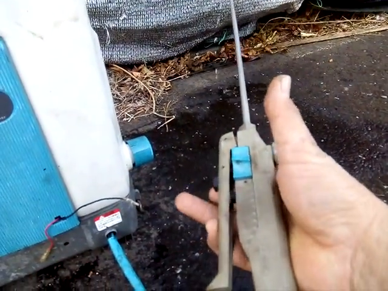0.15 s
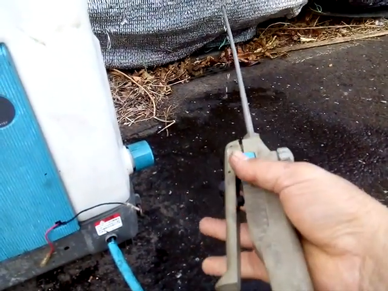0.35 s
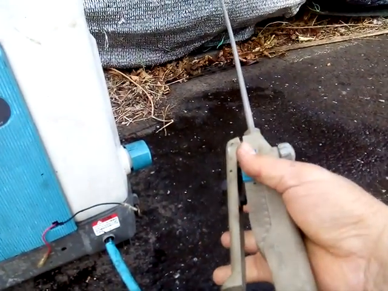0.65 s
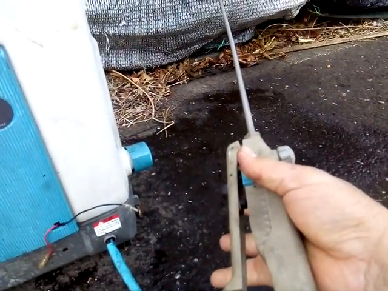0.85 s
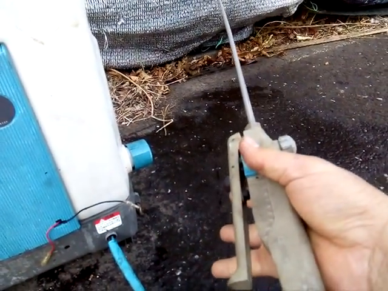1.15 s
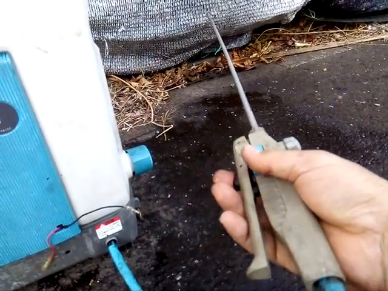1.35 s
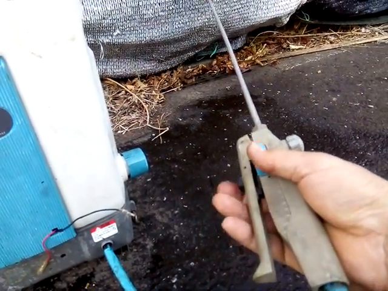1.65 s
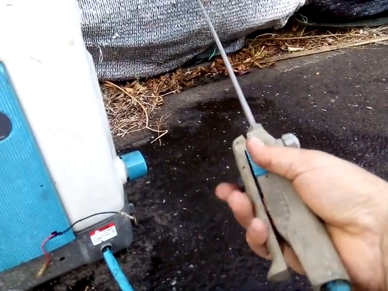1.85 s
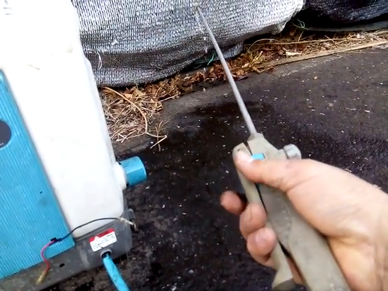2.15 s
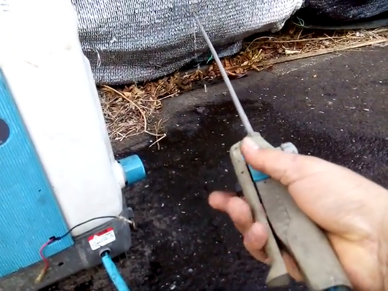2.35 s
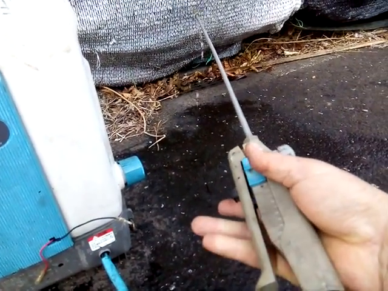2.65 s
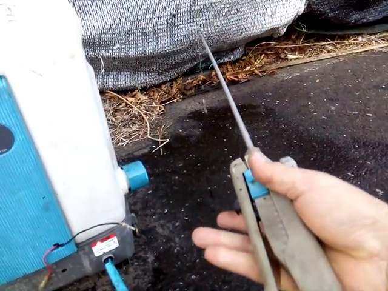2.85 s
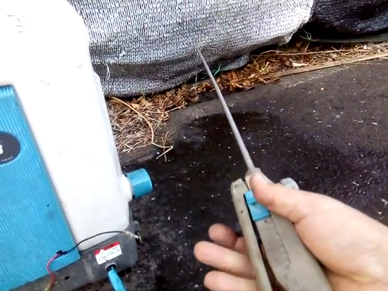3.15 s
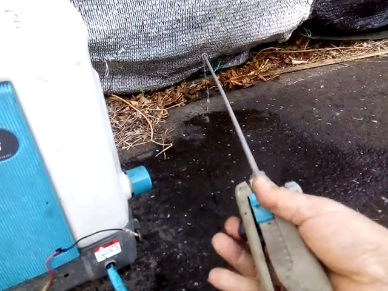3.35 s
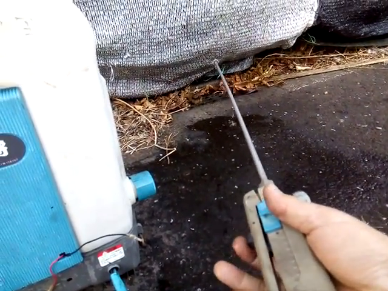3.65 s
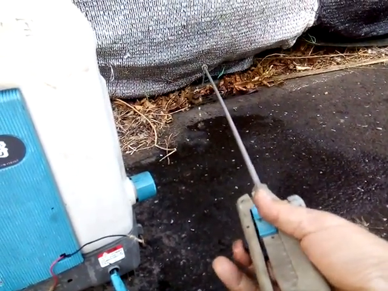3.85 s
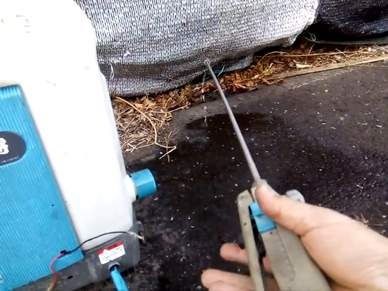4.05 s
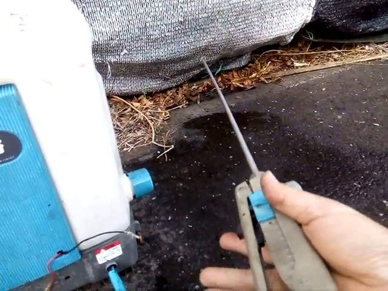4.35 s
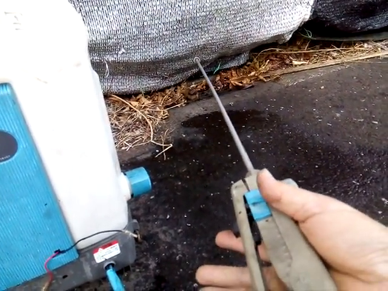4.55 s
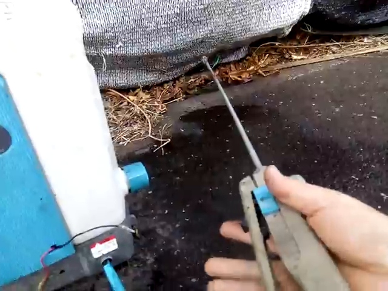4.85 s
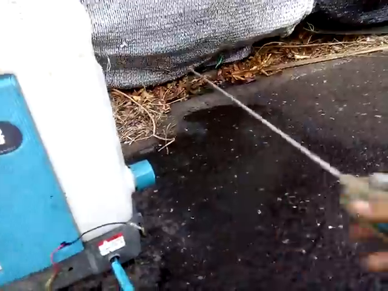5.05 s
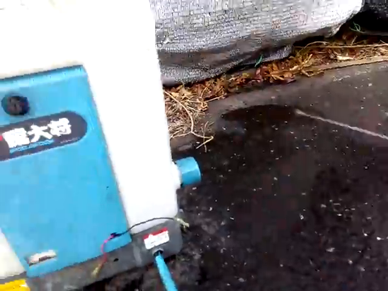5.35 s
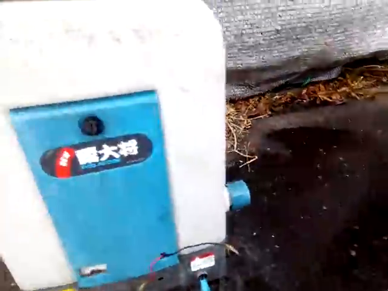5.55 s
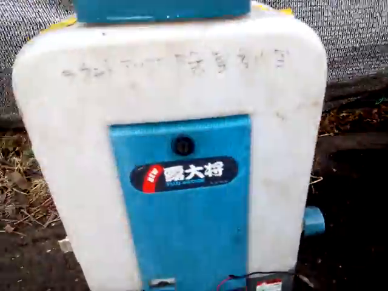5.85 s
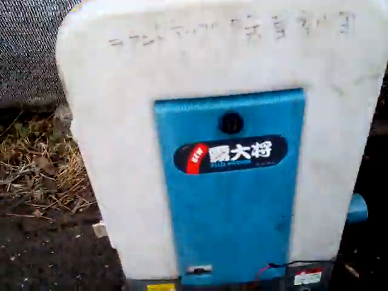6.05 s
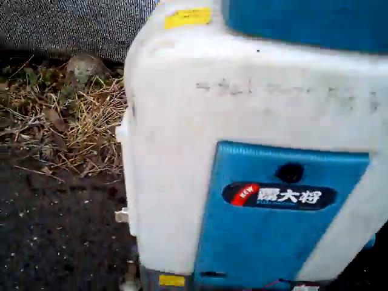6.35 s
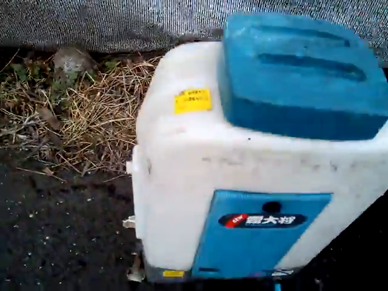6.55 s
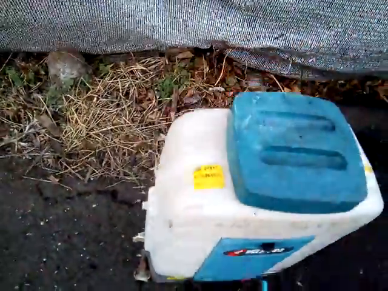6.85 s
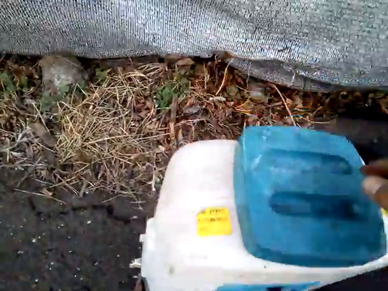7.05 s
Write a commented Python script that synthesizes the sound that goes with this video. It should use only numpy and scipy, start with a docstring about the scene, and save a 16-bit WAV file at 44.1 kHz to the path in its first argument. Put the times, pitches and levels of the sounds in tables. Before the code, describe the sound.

A small electric pump hums and buzzes, stops at a trigger click, runs again, then a loud plastic snap, shut-off, and a clattering lance.

```python
"""A low outdoor rumble and a faint hiss lie under everything in an open yard.
A battery garden sprayer's diaphragm pump hums while water leaves the lance, then coasts to rest: shaft orders,
valve ticks and jet noise follow the shaft. The trigger clicks, through resonances of its plastic, and the pump
runs again; shortly before it stops the trigger lock snaps, a loud bundle of short decaying sines.
Then the lance is laid down with a clatter of struck resonances and a noisy rustle of hose and sleeve."""
import sys
import numpy as np
from scipy import signal
from scipy.fft import rfft, irfft, next_fast_len
from scipy.io import wavfile
from scipy.ndimage import uniform_filter1d, map_coordinates

SR = 44100
rng = np.random.default_rng(int(sys.argv[2]) if len(sys.argv) > 2 else 0)


def wrap_up_sound(samples):
    """Save the sound to the file named by the first command line argument, as 16-bit audio."""
    columns = np.atleast_2d(samples).T
    # keep every value between -1 and 1, then stretch to whole-number steps
    tamed = np.clip(columns, -1, 1)
    steps = np.round(tamed * 32767).astype(np.int16)
    wavfile.write(sys.argv[1], SR, steps)


N = 317520

# shaft speed that counts as 1, in turns a second
REFERENCE_HZ = 38.6
# diaphragm and valve beats within one turn:
# (share of the turn, low thump/dB, bright slap/dB, valve tick/dB, crank knock/dB)
BEATS = [(0, 3.5, -6.5, -2, -0.5), (.155, -3.5, 2.5, -10, -3.5), (.463, -16, -6, -11, 3.5),
         (.563, -6, -5, -9, -3.5), (0.885, -7, -10, -13.5, -10.5)]
# resonances of the pump housing: (f/Hz, width/Hz, level/dB)
HOUSING = [(180, 58, -2), (556.7, 58, 1.5), (782, 56, -7.5), (915.3, 55, -14), (1222, 210, -18.5)]


def amp(db):
    """Decibels to gain."""
    return 10 ** (np.asarray(db) / 20)


def unit(x):
    """Scaled to rms 1."""
    return x / np.sqrt(np.mean(x ** 2) + 1e-20)


def along(points, hz):
    """Value at hz on a curve of (f/Hz, value) points, read on a log axis."""
    f, v = np.transpose(points)
    return np.interp(np.log(hz + 1), np.log(f + 1), v)


def curves(rows):
    """One value per sample for each column after the time."""
    s, *cols = np.transpose(rows)
    return [np.interp(np.arange(N) / SR, s, c) for c in cols]


def wobble(rate):
    """A smooth random curve, rate knots a second."""
    knots = rng.standard_normal(int(N * rate / SR) + 4)
    return map_coordinates(knots, [np.arange(N) * rate / SR])


def pan(db):
    """Left and right gains for a level difference."""
    return amp(np.array([[.5], [-.5]]) * db)


def filtered(x, response):
    """x shaped by a complex response of frequency."""
    n = x.shape[-1]
    m = 2 * next_fast_len((n + min(n, SR // 4)) // 2, real=True)  # room for the ringing
    return irfft(rfft(x, m) * response(np.fft.rfftfreq(m, 1 / SR)), m)[..., :n]


def causal(gain):
    """Minimum-phase response with these gains: it rings only after it is struck."""
    cepstrum = irfft(np.log(np.maximum(gain, 1e-6)))
    half = len(cepstrum) // 2
    folded = np.r_[cepstrum[0], 2 * cepstrum[1:half], cepstrum[half], np.zeros(half - 1)]
    return np.exp(rfft(folded))


def resonances(modes, hz):
    """Response of a body with (f/Hz, width/Hz, level/dB) modes of alternating sign."""
    return sum((-1) ** k * amp(db) * 1j * hz * width / (centre * centre - hz * hz + 1j * hz * width)
               for k, (centre, width, db) in enumerate(modes))


def rush(spectrum):
    """Stereo noise of rms 1, alike in the bass and nearly unrelated in the treble."""
    # left-right likeness of the noise: (f/Hz, correlation)
    likeness = [(130, .94), (290, 0.58), (640, 0.28), (1400, 0.034)]
    turn = lambda hz: np.arccos(np.clip(along(likeness, hz), -1, 1)) / 2
    colour = lambda hz: amp(along(spectrum, hz)) * [np.cos(turn(hz)), np.sin(turn(hz))]
    mid, side = filtered(rng.standard_normal((2, N)), colour)
    return unit(np.array([mid + side, mid - side]))


def add(track, s, sound):
    """Mix a short sound into the track at time s."""
    start = max(round(s * SR), 0)
    part = track[..., start:start + sound.shape[-1]]
    part += sound[..., :part.shape[-1]]


def outdoors(swell_db, swells_per_s, wander_db):
    """A distant rumble that swells and sinks, its upper part on its own, and a faint even hiss."""
    # rumble before its random swell: (t/s, level/dB)
    rumble_levels = [(0, -53.5), (2, -56), (3.4, -53), (3.85, -44.5), (4.5, -56), (5.3, -52), (6.1, -58),
                     (7.2, -55.5)]
    # upper rumble before its random wander: (t/s, level/dB)
    upper_levels = [(.55, -64), (.85, -55.5), (1.15, -61), (1.45, -53.5), (1.75, -65), (2, -57),
                    (4.4, -60.5), (5.55, -55), (6, -59.5), (6.55, -65), (6.78, -50.5), (6.92, -67)]
    # noise colour of rumble, upper rumble and hiss: (f/Hz, density/dB per Hz)
    rumble_colour = [(12, -58), (20, -23.5), (32, -15), (80, -2), (115, -3), (166, -7), (205, -11),
                     (281, -18), (325, -16), (532, -33), (900, -43.5), (1170, -78.5), (1980, -120)]
    upper_colour = [(90, -31), (125, -8), (146, 3), (172, -8), (205, -3.5), (260, -13.5), (420, -35),
                    (900, -69.5)]
    hiss_colour = [(290, -25.5), (500, -5), (748, -10.5), (927, -10.5), (1060, -13), (1150, -13),
                   (1580, -16), (3740, -18.5), (4500, -14.5), (5350, -19.5), (15500, -40.5)]
    level, = curves(rumble_levels)
    upper_level, = curves(upper_levels)
    rumble = amp(level + swell_db * wobble(swells_per_s)) * rush(rumble_colour)
    upper = amp(upper_level + wander_db * wobble(9)) * rush(upper_colour)
    hiss = amp(-72) * rush(hiss_colour)
    return pan(0.84) * (rumble + upper + hiss)


def yard(x):
    """Ground and fence give a weak answer; each frequency dies at its own speed."""
    # decay of the answer: (f/Hz, t60/s)
    decay = [(200, 1), (2000, 0.067), (5000, 0.17), (12000, 0.17)]
    hz, t, z = signal.stft(rng.standard_normal((2, SR // 2)), SR, nperseg=256)
    tail = signal.istft(z * amp(-60 * t / along(decay, hz)[:, None]), SR, nperseg=256)[1]
    return signal.fftconvolve(x, tail / np.linalg.norm(tail[0]), axes=1)[:, :N]


def strokes():
    """Strength of the hose's drag and the sleeve's rustle: each arm movement swells and dies away."""
    # arm movements: (t/s of the fastest moment, flank length/s, hose drag/dB, sleeve rustle/dB)
    moves = [(1.125, 0.28, -75.5, -76.5), (5.223, 0.18, -68, -62), (5.852, 0.22, -50, -52.5),
             (6.21, 0.069, -59.5, -54.5), (6.362, 0.14, -55.5, -52.5), (6.733, 0.2, -66, -61),
             (7.104, 0.16, -78, -63.5)]
    # exponent of the bell's flanks, and its dying away over its swelling
    shape, release = 1.42, 1.01
    t, power = np.arange(N) / SR, np.zeros((2, N))
    for s, length, drag_db, rustle_db in moves:
        away = np.maximum((s - t) / length, (t - s) / (length * release))
        power += (amp([[drag_db], [rustle_db]]) * np.exp(-away ** shape)) ** 2
    return np.sqrt(power)


def patchy(x, depth_db):
    """Sliding contact keeps shifting: the colour changes in random patches."""
    z = signal.stft(x, nperseg=512)[2]
    field = uniform_filter1d(rng.standard_normal(z.shape[1:]), size=3, axis=0)
    field = uniform_filter1d(field, size=7, axis=1)
    return signal.istft(z * amp(depth_db * unit(field)), nperseg=512)[1][:, :N]


def scrapes(width_hz):
    """The hose scrapes along the tank: narrow rasps that swell, glide in pitch and fade."""
    # scrapes: (start t/s, length/s, first f/Hz, last f/Hz, level/dB)
    rasps = [(5.735, 0.06, 2800, 2950, -52), (5.87, 0.077, 2700, 2700, -53.5),
             (5.78, 0.45, 1450, 1100, -62), (6.0, 0.6, 1330, 1450, -66)]
    out = np.zeros((2, N))
    for s, length, first_hz, last_hz, db in rasps:
        u = np.linspace(0, 1, round(length * SR))
        noise = rng.standard_normal((2, len(u)))
        rasp = unit(filtered(noise, lambda hz: 1 / (1 + (hz / width_hz) ** 2)))
        pitch_hz = first_hz + (last_hz - first_hz) * u
        glide = np.sqrt(2) * np.sin(2 * np.pi * np.cumsum(pitch_hz) / SR)
        add(out, s, amp(db) * np.sqrt(abs(np.sin(np.pi * u))) * rasp * glide)
    return out


def handling(grain_db, patchy_db):
    """Hose and sleeve slide in uneven grains as the arm moves."""
    # noise colour of hose drag and sleeve rustle: (f/Hz, density/dB per Hz)
    drag_colour = [(200, -4), (350, -4.5), (700, -7.5), (1000, -7), (1400, -2), (1900, -5.5), (2600, -5),
                   (3500, -4.5), (6000, -42.5)]
    rustle_colour = [(1500, -12.5), (2800, -13.5), (3800, -0.5), (4600, 5), (5400, 0), (6300, 0),
                     (7200, -18.5), (8300, -50), (14000, -41.5)]
    drag, rustle = strokes()
    grains = lambda: unit(amp(grain_db * (wobble(180) + 0.79 * wobble(35))))
    hose = grains() * (drag * unit(patchy(rush(drag_colour), patchy_db)) + scrapes(width_hz=100))
    sleeve = rustle * grains() * rush(rustle_colour)
    return pan(1.7) * (hose + sleeve)


def clatter(side_spread_db, dulling_db, count):
    """Rows for clicks(): each blow of the lance, its weaker, duller rebound, and rattling fittings."""
    # lance meets tank and ground:
    # (t/s, peak/dB, left-right/dB, tilt/dB per octave, favoured f/Hz, its lift/dB)
    blows = [(5.381, -34.5, -1, 2, 3320, 5), (5.538, -34.5, 5, 1, 2090, 12),
             (5.5485, -11, -3.5, 1.5, 3240, 10), (5.575, -36, 4, -3, 2600, 4.5),
             (5.6082, -21.5, -5, 8, 5840, 7.5), (5.622, -42.5, -6, 4, 5600, 6),
             (5.6495, -24, -1.5, 0.5, 845, 5.5), (5.662, -32.5, 5, -1, 2550, 1),
             (5.692, -27.5, -1, 2.5, 3300, 11), (5.700, -30.5, -9, 2, 5550, 10),
             (5.712, -34.5, -5, 1, 3200, 8), (5.802, -41, -8, 5.5, 5500, 0),
             (5.8398, -6.5, -2, 8, 2477, 19), (5.8472, -3.5, 4.5, 1, 4580, 7.5),
             (5.865, -38, -3.5, -1, 4170, 16), (5.886, -29.5, -8.5, 2, 2600, 8), (5.9, -31, 6, 1, 5800, 5),
             (5.929, -30.5, 0, 0.5, 2450, 13), (5.945, -34.5, 4, -2, 2550, 16),
             (6.6818, -22.5, 5, -1.5, 3780, 15.5)]
    # loose fittings rattle while the lance settles: (from t/s, to t/s, middle peak/dB)
    start, end, db_loose = (5.56, 5.96, -40)
    t60, flight_s, rebound_loss_db = 0.03, 0.011, 20.5
    rows = []
    for (s, db, side_db, tilt_db, *spot), flight in zip(blows, rng.standard_normal(len(blows))):
        rows.append((s, db, side_db, tilt_db, t60, *spot))
        landing = s + flight_s * np.exp(0.16 * flight)
        rows.append((landing, db - rebound_loss_db, side_db, tilt_db - dulling_db, t60, *spot))
    for k, (when, size, side, tilt, spot) in enumerate(rng.uniform(-0.63, 1, (count, 5))):
        s = start + (end - start) * (k + .5 + .5 * when) / count
        rows.append((s, db_loose + 3 * size, side_spread_db * side, 4 * tilt - dulling_db, .02,
                     1300 * 2 ** spot, 9))
    return rows


def clicks(rows, modes, crack_db, crack_t60, soft_hz, low_hz, favoured_width_hz):
    """A sharp crack and a short chatter ring the resonances; the spot struck favours one region."""
    out, t = np.zeros((2, N)), np.arange(SR // 12) / SR
    for s, db, side_db, tilt_db, t60, ring_hz, lift_db in rows:
        envelope = amp(-60 * t / t60) + amp(crack_db - 60 * t / crack_t60)
        force = rng.standard_normal((2, len(t))) * envelope
        edge_hz = soft_hz * 2 ** (tilt_db / 16)  # a bright contact also reaches higher
        tilted = lambda hz: amp(tilt_db * np.log2(np.clip(hz, 1000, 8000) / 4000))
        colour = lambda hz: tilted(hz) * (0.21 + 1 / np.sqrt(1 + (hz / edge_hz) ** 12))
        small = lambda hz: .06 + hz ** 6 / (hz ** 6 + low_hz ** 6)  # a small part radiates little bass
        spot = lambda hz: amp(lift_db / (1 + ((hz - ring_hz) / favoured_width_hz) ** 2))
        ring = filtered(force, lambda hz: resonances(modes, hz) * causal(colour(hz) * small(hz) * spot(hz)))
        add(out, s, amp(db) * pan(side_db) * ring / abs(ring).max(axis=1, keepdims=True))
    return out


def lock(crack_db, rise_s, far_hold):
    """The trigger lock springs over: one very loud, short ring, which dies sooner on the right."""
    # the snap: (t/s, gain/dB, left-right/dB)
    s, db, side_db = (3.9759, 3.14, 2.2)
    # partials of the ring: (f/Hz, level/dB, hold/s, t60/s)
    partials = [(2497, -25.5, .001, 0.0053), (3450, -26.5, .001, 0.021), (4478, -0.5, 0.0029, 0.0095),
                (4400, -21.5, .001, .04), (5350, -4, .001, 0.0058), (6600, -3.5, 0.0013, 0.0068)]
    out, t = np.zeros((2, N)), np.arange(SR // 10) / SR
    holding = np.array([[1], [far_hold]])
    ring = sum(amp(level - 60 * np.maximum(t - hold * holding, 0) / t60) * np.sin(2 * np.pi * hz * t)
               for hz, level, hold, t60 in partials)
    crack = amp(crack_db - 60 * t / .008) * rng.standard_normal((2, len(t)))
    onset = 1 - np.exp(-(t / rise_s) ** 2)
    add(out, s, amp(db) * pan(side_db) * onset * (ring + crack))
    return out


def shaft():
    """Shaft speed, turns and age of the run: it spins up, sags as pressure builds, coasts to rest."""
    # pump runs: (on t/s, off t/s, free speed/turns per s, crank angle when first heard/turns)
    runs = [(-1, .3344, 37.894, .312), (2.0051, 4.0957, 39.431, .274)]
    spin_up_s, sag_hz_per_s, coast_s = .0477, .742, .1836
    t = np.arange(N) / SR
    speed, turns, age = np.zeros((3, N))
    for on, off, free_hz, angle in runs:
        live = (t >= on) & (t < off + coast_s)
        age[live] = t[live] - on
        coasting = np.clip(1 - (t[live] - off) / coast_s, 0, 1)
        spin_up = 1 - np.exp(-age[live] / spin_up_s)
        rate = (free_hz - sag_hz_per_s * age[live]) * spin_up * coasting
        speed[live], turns[live] = rate / REFERENCE_HZ, angle + np.cumsum(rate) / SR
    return speed, turns, age


def hum(speed, turns, waver_db):
    """Shaft orders, phased into each turn's beats, swell as they slide into housing resonances."""
    # orders of the motor's hum: (multiple of the shaft speed, relative level/dB)
    orders = [(2, -8), (3, -6), (4, -8), (5, -1), (6, -12), (7, -13), (8, -15), (9, -13), (10, -22),
              (11, -23.5), (12, -13), (13, -11), (14, -9), (15, 0), (16, -3.5), (17, -15), (18, -10.5),
              (19, -2.5), (20, -2.5), (21, -6), (22, -13), (23, -7), (24, -6), (25, -20.5), (26, -6),
              (27, -25), (28, -15.5), (29, -17), (30, -26), (31, -11), (32, -19), (33, -12.5), (34, -18),
              (35, -15), (39, -18.5), (40, -20), (41, -22), (44, -21.5), (113, -25.5), (120, -26),
              (132, -30.5), (162, -33.5)]
    # left-right likeness of the hum: (f/Hz, correlation)
    likeness = [(130, 0.99), (290, 1), (640, 0.31), (1400, 0.15)]
    thump_hz, slap_hz = 500, 1500  # between these the beats' phasing goes from thump to slap
    out, running = np.zeros((2, N)), np.flatnonzero(speed > .5)
    grid = np.linspace(.5, 1.1, 100)
    for k, db in orders:
        hz = k * REFERENCE_HZ
        throb = sum(amp(along([(thump_hz, thump_db), (slap_hz, slap_db)], hz)) * np.exp(-2j * np.pi * k * share)
                    for share, thump_db, slap_db, *_ in BEATS)
        gain = abs(resonances(HOUSING, hz * grid) / resonances(HOUSING, hz))
        swell = np.interp(speed[running], grid, gain)
        lead = np.arccos(np.clip(along(likeness, hz), -1, 1)) * np.array([[.5], [-.5]])
        waver = np.interp(running, np.linspace(0, N, num=50), rng.standard_normal(50))
        # the lowest orders are spread over the turn, so the bass hums evenly instead of pulsing
        spread = .2 * max(12 - k, 0) ** 2
        size = amp(db + waver_db * waver) * swell / np.cos(lead[0] / 2) ** 2  # wide orders get a lift
        out[:, running] -= size * np.sin(2 * np.pi * k * turns[running] + np.angle(throb) + spread + lead)
    return out / np.linalg.norm(amp(np.array(orders)[:, 1])) * np.sqrt(2)


def beats(speed, turns, driven_softening, coasting_softening, uneven_db):
    """Pulses of diaphragm thumps, valve ticks and crank knocks: softer when slow, less so when driven."""
    thumps, ticks, knocks = trains = np.zeros((3, N))
    for share, thump_db, _, tick_db, knock_db in BEATS:
        at = np.flatnonzero((np.diff(np.floor(turns - share)) == 1) & (speed[:-1] > 0))
        force = speed[at] ** np.where(speed[at + 1] > speed[at], driven_softening, coasting_softening)
        sizes = amp([[thump_db], [tick_db], [knock_db]]) * force
        sizes[0] *= speed[at] if share else 1  # the after-thumps need speed
        sizes[1:] *= amp(uneven_db * wobble(40)[at])
        # a beat falls between two samples
        early = np.clip((turns[at + 1] - share) % 1 / (turns[at + 1] - turns[at]), 0, 1)
        trains[:, at] += sizes * early
        trains[:, at + 1] += sizes * (1 - early)
    return thumps, ticks, knocks


def gushes(speed, turns, driven_softening, coasting_softening):
    """Water squeezes through the valves for a fixed part of each turn: groans at start, fading gurgles."""
    # gushes within one turn: (share of the turn, half-width/turns, level/dB)
    openings = [(.16, 0.092, -0.5), (.63, 0.127, -1)]
    # noise colour of the water: (f/Hz, density/dB per Hz)
    water_colour = [(120, -30), (280, -9.5), (520, 8), (680, 2), (900, -3), (1250, -5), (1550, -14),
                    (1800, -21), (2400, -17.5), (3500, -46.5)]
    opening = sum(amp(db) * np.exp(-(((turns - share + .5) % 1 - .5) / width) ** 2)
                  for share, width, db in openings)
    force = speed ** np.where(np.gradient(speed) > 0, driven_softening, coasting_softening)
    return force * (opening + 0.19) * rush(water_colour)  # 0.19: the noise never closes between gushes


def bursts(pulses, rise_s, t60):
    """The envelope of a short gush after every pulse."""
    t = np.arange(SR // 10) / SR
    return signal.fftconvolve(pulses, (1 - np.exp(-t / rise_s)) * amp(-60 * t / t60))[:N]


def rattle(ticks, spectrum, t60, tail_db):
    """Each beat rattles briefly inside the casing, with the same noise burst every turn."""
    t = np.arange(SR // 20) / SR
    casing = (amp(-60 * t / t60) + amp(tail_db - 60 * t / 0.18)) * rng.standard_normal((2, len(t)))
    casing = filtered(casing, lambda hz: causal(amp(along(spectrum, hz))))
    casing /= np.linalg.norm(casing, axis=1, keepdims=True)
    return signal.oaconvolve(ticks[None], casing, axes=1)[:, :N]


def valve_ring(ticks, lead_s):
    """The valve head rings after every tick and reaches the left ear a little sooner."""
    # resonances of the valve head: (f/Hz, width/Hz, level/dB)
    head = [(3160, 59, -12.5), (3750, 150, -7), (4200, 100, -3.5), (4430, 160, 5), (4700, 83, -0.5),
            (5250, 170, -5), (5600, 160, -10.5), (6140, 170, -6)]
    sides = np.array([[1], [-1]])
    return filtered(ticks, lambda hz: resonances(head, hz) * np.exp(1j * np.pi * hz * lead_s * sides))


def pump(hum_db, thump_db, gush_db, tick_db, ring_db, buzz_db, jet_db, pulsing, lag_turns,
         chug_low_hz, chug_top_hz):
    """Single chugs at low speed merge into a hum; valves tick and the jet spurts with each beat."""
    # colour of the valves' ticks and the crank's buzz: (f/Hz, level/dB)
    tick_colour = [(2000, -39.5), (3300, -12), (3800, -6), (4350, 1.5), (4800, -1.5), (5250, -5),
                   (5900, -10.5), (7100, -14), (8200, -47.5), (9000, -33.5), (11000, -29.5), (12000, -57)]
    crank_colour = [(1100, -20), (1350, -5), (1600, -2.5), (1800, -11), (2050, -9), (2400, -15),
                    (3300, -12), (4200, -16.5), (6000, -53.5)]
    # noise colour of the jet: (f/Hz, density/dB per Hz)
    jet_colour = [(1200, 0.5), (2500, -10), (3400, -12.5), (4300, -0.5), (5500, -9), (7000, -9),
                  (8200, -36.5), (14000, -37.5)]
    # the valve slams on its seat: (f/Hz, width/Hz, level/dB)
    seat = [(4400, 1300, -1.8)]
    # stereo balance of the whole pump: (f/Hz, left-right/dB)
    balance = [(60, 3.5), (200, 0), (400, 4.5), (700, 2.5), (1300, 5.5), (2400, 3), (4400, 11),
               (8000, -2.5)]
    surge_db, surge_s = 1.5, 0.38  # extra effort just after switching on, and how fast it settles
    speed, turns, age = shaft()
    thumps, ticks, knocks = beats(speed, turns, driven_softening=1.0, coasting_softening=1.6, uneven_db=1.7)
    merged = np.clip(speed / .94, 0, 1) ** 10
    effort = amp(surge_db * np.exp(-age / surge_s))
    drone = amp(hum_db) * merged * hum(speed, turns - lag_turns, waver_db=1.5)

    chug_band = lambda hz: 1j * hz / (chug_low_hz + 1j * hz) / (1 + 1j * hz / chug_top_hz) ** 2
    body = filtered(thumps, lambda hz: resonances(HOUSING, hz) * chug_band(hz))
    water = gushes(speed, turns, driven_softening=0.67, coasting_softening=1.2)
    chugs = (1 - merged) * (amp(thump_db) * body + amp(gush_db) * water)

    # the valves slam and ring high and short; the crank buzzes lower and longer
    slam = filtered(ticks, lambda hz: resonances(seat, hz) ** 4)
    ticking = amp(tick_db) * rattle(ticks, tick_colour, t60=.016, tail_db=-25.5)
    ringing = amp(ring_db) * valve_ring(ticks, lead_s=.00004)
    valves = speed ** .8 * (slam + ticking + ringing)
    crank = amp(buzz_db) * speed * rattle(knocks, crank_colour, t60=0.02, tail_db=-29.0)
    spurts = 1 + pulsing * bursts(ticks + .15 * knocks, rise_s=0.00099, t60=0.038)
    jet = amp(jet_db) * speed ** 2 * spurts * rush(jet_colour)
    return filtered(effort * (drone + chugs + crank + valves + jet), lambda hz: pan(along(balance, hz)))


def scene():
    """Pump, hand and lance in the open yard."""
    # trigger and lever clicks:
    # (t/s, peak/dB, left-right/dB, tilt/dB per octave, t60/s, favoured f/Hz, its lift/dB)
    presses = [(.0295, -29, 8, -6.5, 0.027, 2240, 8), (.3455, -17, 4, -2, 0.02, 2800, 10.5),
               (.505, -47.5, -6, 1, 0.11, 6160, 0), (.522, -44.5, 2, 0, 0.18, 3360, 18),
               (1.3938, -39.5, 5, -7, 0.15, 2180, 6), (1.4587, -37, 6, -4.5, 0.017, 4100, 11),
               (1.51, -51, 4, -2, .02, 4300, 6), (1.980, -41.5, 3, -7, 0.15, 4470, 8),
               (1.9938, -14.5, 2, -2.5, .019, 2600, 9), (2.0218, -23, 10, -10.5, 0.029, 4200, 8),
               (2.5595, -27.5, 12.5, -2, 0.013, 4330, 20), (2.574, -27.5, 7, 0, 0.014, 4730, 11),
               (3.5384, -43, -4, 15, .0099, 10100, 16), (4.1036, -18.5, 2, -4, 0.03, 2600, 5),
               (4.1098, -16, 8, -3.5, 0.012, 4730, 12.5), (4.381, -44.5, -7, 10, 0.032, 6150, 20),
               (4.997, -52, 9, -5, .04, 3400, 4)]
    # resonances of the plastic lever and of the lance: (f/Hz, width/Hz, level/dB)
    lever_modes = [(1910, 100, -2.5), (2550, 1100, -0.5), (3330, 140, 4), (4220, 560, 10.5),
                   (5100, 850, 13), (6150, 570, 14.5)]
    lance_modes = [(293, 170, -10), (940, 440, -6), (1460, 150, -5.5), (2120, 190, -0.5), (2550, 310, 0.5),
                   (3240, 550, 0), (3960, 170, 1), (4430, 465, 5.5), (6360, 1430, -9)]
    motor = pump(hum_db=-37.5, thump_db=15.5, gush_db=-36, tick_db=-23.5, ring_db=-17, buzz_db=-29.5,
                 jet_db=-62, pulsing=5, lag_turns=.049, chug_low_hz=263.4, chug_top_hz=972)
    trigger = clicks(presses, lever_modes, crack_db=7, crack_t60=0.0061, soft_hz=6700, low_hz=1620,
                     favoured_width_hz=400)
    contacts = clatter(side_spread_db=8, dulling_db=5.5, count=14)
    lance = clicks(contacts, lance_modes, crack_db=-1, crack_t60=0.0067, soft_hz=6500, low_hz=60,
                   favoured_width_hz=270)
    snap = lock(crack_db=-24, rise_s=0.00071, far_hold=0.33)
    echo = yard(amp(-12.5) * trigger + amp(-16.0) * lance + amp(-21.0) * snap)
    rubbing = handling(grain_db=1.5, patchy_db=2.5)
    background = outdoors(swell_db=0.93, swells_per_s=5.4, wander_db=2)
    return motor + trigger + lance + snap + echo + rubbing + background


def record(dry):
    """The recorder clips at full scale, then cuts steeply above its band limit."""
    top_hz = 15300
    return filtered(np.clip(dry, -1, 1), lambda hz: 1 / np.sqrt(1 + (hz / top_hz) ** 160))


dry = scene()
out = record(dry)
wrap_up_sound(out)
```